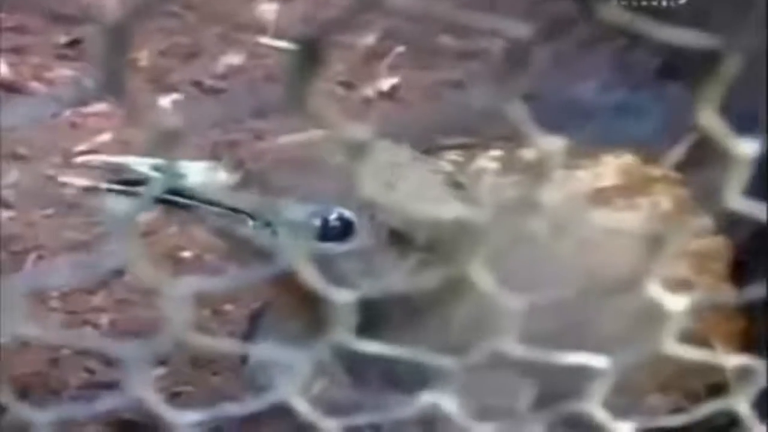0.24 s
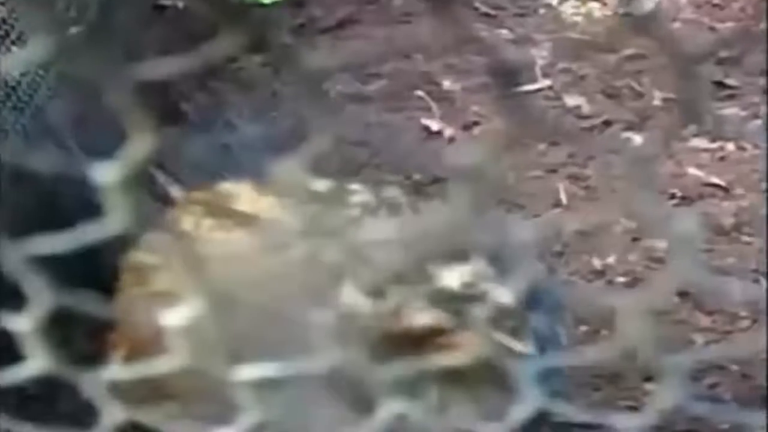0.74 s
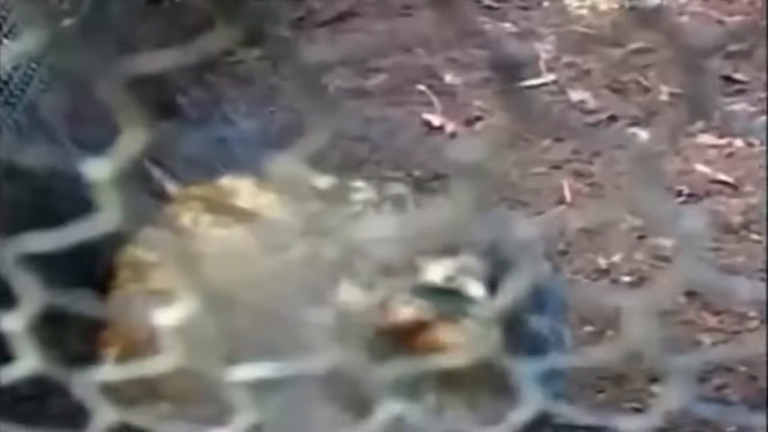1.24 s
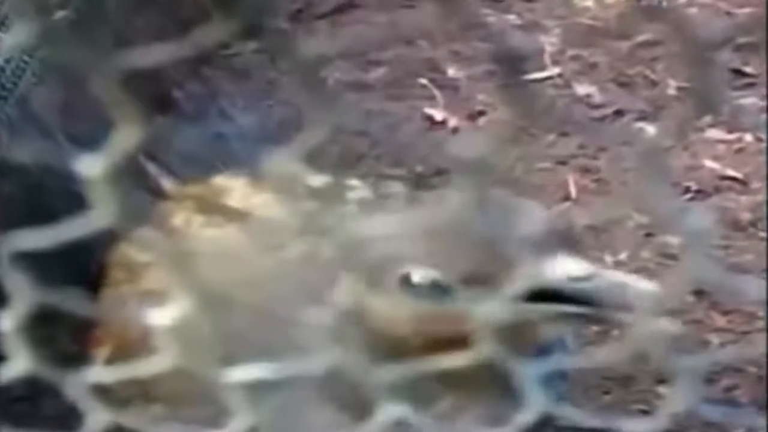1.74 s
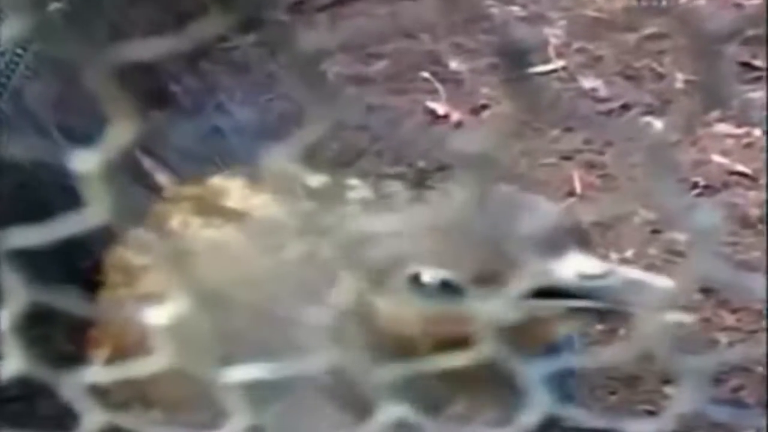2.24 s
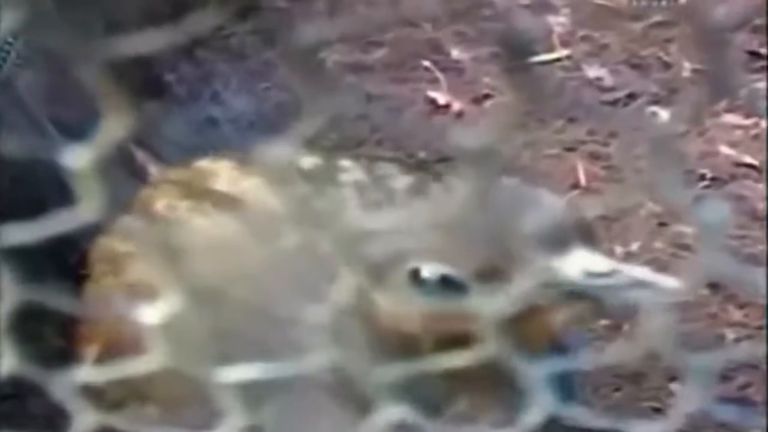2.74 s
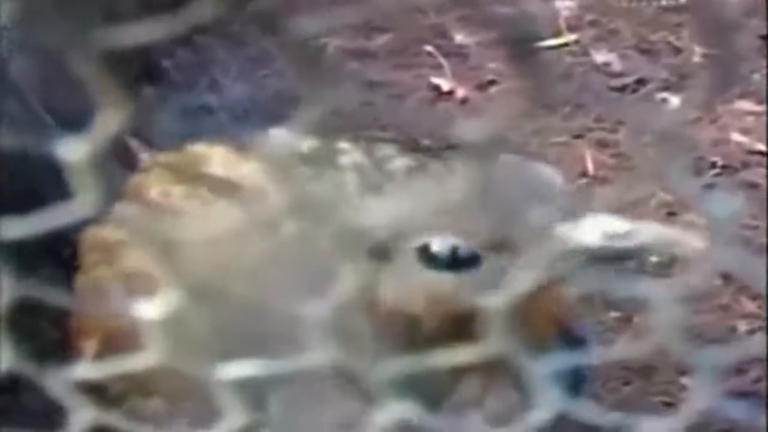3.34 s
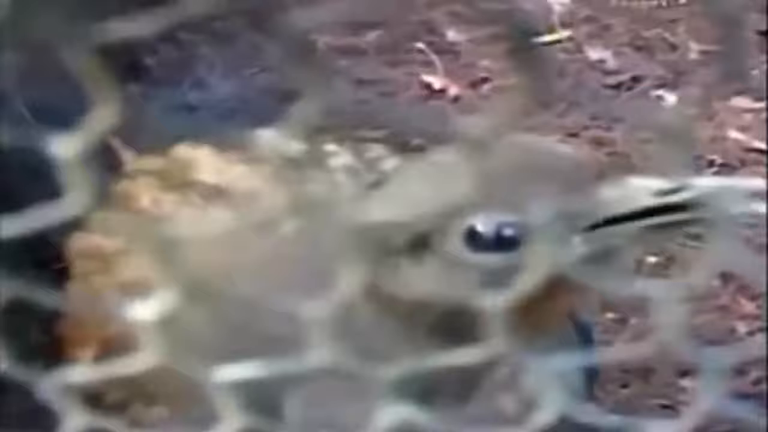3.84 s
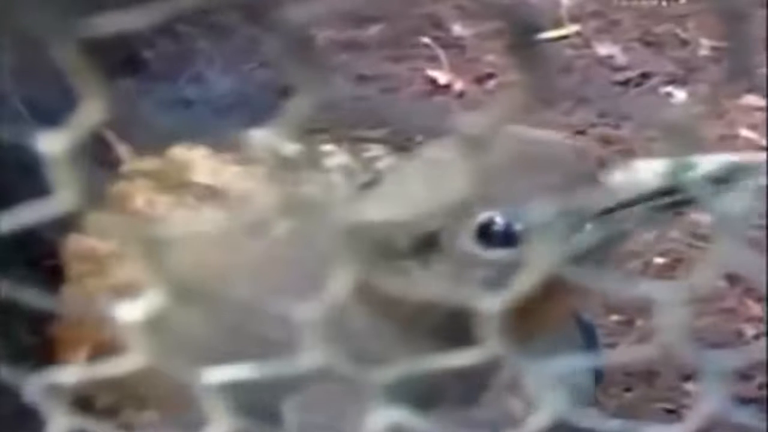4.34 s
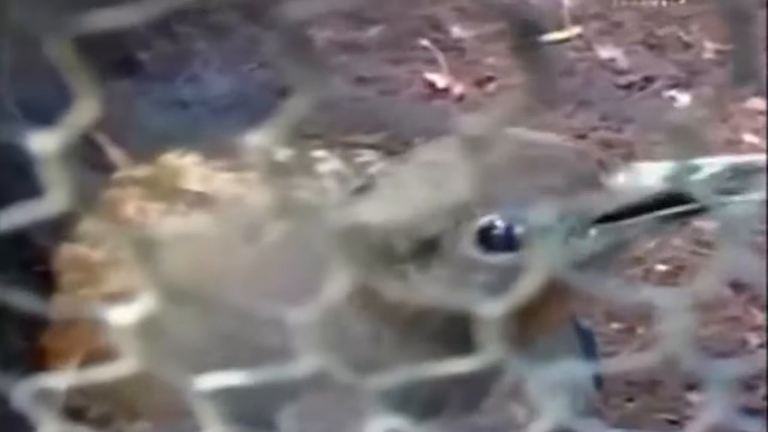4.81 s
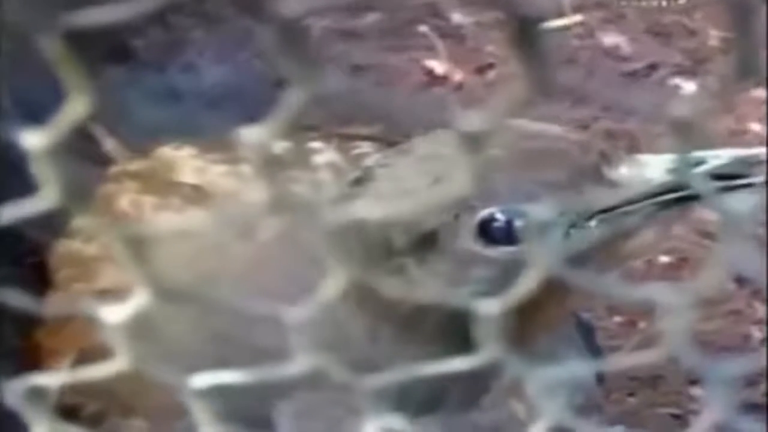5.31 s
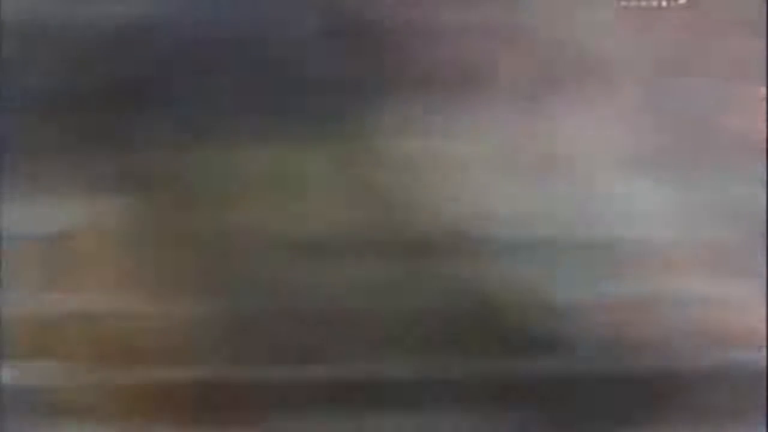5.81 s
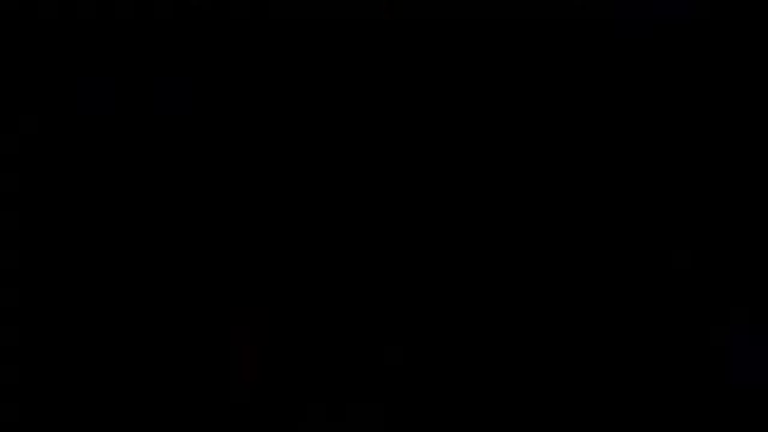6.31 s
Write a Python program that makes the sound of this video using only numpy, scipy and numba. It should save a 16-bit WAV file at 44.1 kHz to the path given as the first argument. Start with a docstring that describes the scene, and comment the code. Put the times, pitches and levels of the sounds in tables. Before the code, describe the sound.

A bird close to a small microphone imitates a power drill outdoors. It starts mid-rev, a raspy, throbbing whine over a whirr, rising and falling by 0.4 seconds. A longer, higher rev follows, sinking away by about 1.3 seconds, while distant birds call faintly. From 1.4 to 3.7 seconds the bird makes a rapid rattle, about thirty hollow clacks a second over a rough whirr, strongest in the first half second and ending with a sharp snap. After a short pause, a quick, rough rev comes at 4.1 seconds. Three more follow at about 4.6, 5.1 and 5.6 seconds, each gliding up and down with a metallic edge, the last one longer and higher. A soft, low park rumble and faint airy noise continue underneath, with occasional far bird calls. Everything cuts off abruptly at 6.3 seconds.

```python
"""A mimic bird behind wire mesh imitates a power drill, close to a small camera microphone.
One side of its voice box (the syrinx) whines up and down in pitch. The other side flutters
chaotically, making a whirr that rings the windpipe, chest and beak. In the long middle stretch
the throat clacks about thirty times a second. Far birds call over the rumble of a park."""
import sys
import numpy as np
from scipy import signal
from scipy.io import wavfile
from scipy.ndimage import uniform_filter1d
from numba import njit

SR = 44100
rng = np.random.default_rng(int(sys.argv[2]) if len(sys.argv) > 2 else 0)


def master_out(mix):
    """Clip the mix to full scale and print it as 16-bit PCM to the path in sys.argv[1]."""
    frames = np.transpose(np.atleast_2d(mix))
    ceiling = np.clip(frames, -1, 1)
    pcm = np.round(ceiling * 32767).astype(np.int16)
    wavfile.write(sys.argv[1], SR, pcm)


N = 289737

# Named song shapes, each like a drill being revved. Levels in all tables are relative.
# (time into the shape [s], pitch [Hz], whine [dB], whirr [dB], treble [dB])
REV_SHAPES = { "short": [(0, 600.4, -36.5, -35, -83), (.06, 726.6, -27, -17, -41),
              (.115, 911.4, -21, -19.5, -38.5), (.155, 1068, -20.5, -21.5, -39),
              (.19, 1141, -22.5, -21.5, -39), (.29, 1198, -23.5, -24, -39), (.34, 1270, -24.5, -24.5, -36),
              (.455, 996, -27, -27, -57), (.535, 710.1, -46.5, -28.5, -65.5)],
              "long": [(0, 715, -42, -26.5, -68), (.07, 810, -25, -20.5, -53.5),
              (.12, 1040, -22, -17, -48.5), (.29, 1450, -28.5, -21, -41), (.4, 1530, -24.5, -18, -38),
              (.53, 1555, -24, -20.5, -40.5), (.565, 1470, -27.5, -22, -42), (.6, 1335, -28, -22.5, -46),
              (.7, 1140, -28, -30.5, -50.5), (.875, 805, -34, -28.5, -57)],
              "stub": [(0, 1009, -32.5, -26.5, -58), (.03, 1010, -46, -32.5, -87)],
              "blip": [(0, 699.9, -58, -36.5, -52.5), (.024, 738.6, -55.5, -22.5, -48),
              (.085, 823.4, -26.5, -16, -34.5), (.115, 890.4, -21, -16.5, -36),
              (.16, 1328, -21.5, -25, -29), (.19, 1330, -17, -31.5, -34), (.22, 1150, -19.5, -15, -31),
              (.27, 692.9, -33, -21.5, -46), (.305, 572.2, -36.5, -38, -74), (.32, 522.8, -57, -35, -80)],
              "arch": [(0, 545, -53, -37, -68.5), (.028, 662.4, -31.5, -24, -39.5),
              (.09, 910, -21, -23, -36), (.175, 1089, -20.5, -27, -40), (.23, 1145, -22.5, -24.5, -41.5),
              (.325, 1098, -23, -25, -39.5), (.37, 995, -21.5, -20.5, -42), (.45, 661.6, -45.5, -25, -64)],
              }
# The shapes as sung: (name, start [s], gain [dB], unevenness [0-1], chest [dB], overtone boost [dB])
REVS_SUNG = [("short", -.147, 0, 0.077, -45, .1), ("long", .424, 0, 0.16, -45, .1),
             ("stub", 1.364, 0, 0.19, -42, .1), ("blip", 4.08, 0, 0.54, -36, -12.5),
             ("arch", 4.575, 0, .08, -47.5, .1), ("short", 5.06, 0, 0.074, -47.5, .1),
             ("long", 5.631, -2.5, 0.099, -46.5, .1)]
# When the bird whines: (start [s], end [s])
WHINE_SPANS = [(0, 1.395), (4.08, 4.4), (4.575, 6.3)]
# The tone at twice the pitch: (pitch [Hz], level against the lowest tone [dB])
OCTAVE_LEVELS = [(600, 0), (900, -5), (1080, -5), (1270, -0.5), (1450, 1), (1550, -6)]
# Overtones that give the whine its edge: (multiple of the pitch, level [dB])
EDGE_OVERTONES = [(3, -17.5), (4, -28.5), (5, -25), (6, -33), (7, -38)]
# Where the windpipe rings: (frequency [Hz], width [Hz], level [dB])
PIPE_RINGS = [(799, 680, 5.5), (980.6, 346, -2.5), (1565, 350, 2), (2071, 427, 0), (2380, 570, 11.5),
              (3008, 315, 9)]
# Where the beak rings: (frequency [Hz], width [Hz], level [dB])
BEAK_RINGS = [(3395, 190, 5), (3948, 570, 2), (4467, 400, 4), (5147, 310, -1), (5535, 380, -2.5),
              (6234, 1200, -5), (7886, 970, -3), (8886, 740, -13), (9640, 500, -6.5)]
# Balance of the windpipe's rings, one row for whining and one for clacking:
# (second ring [dB], third ring [dB], fourth ring [dB], top rings [dB], their rise with treble [dB/dB])
PIPE_BALANCE = [(-14, -13.5, -4.5, 10.8, 1.1), (-8.5, -14.5, -12, 8.94, 0.62)]
# The whirr under the clacks:
# (time [s], whirr [dB], treble [dB], pulsing of the low rings [factor], lowest, nasal ring [dB])
RATTLE_WHIRR = [(1.44, -35, -70, .5, -31), (1.47, -35.5, -45, .5, -11), (1.485, -21, -41.5, .5, -16),
                (1.55, -17, -38, .5, -16), (1.73, -16, -38, .5, -14), (2.0, -16.5, -37, .5, -20.5),
                (2.35, -21, -41, .5, -11.5), (2.84, -17.5, -38.5, .6, -20.5), (3.2, -23.5, -44, 3, -13.5),
                (3.5, -21, -45.5, 3.3, -14.5), (3.61, -12, -41, .6, -15.5), (3.64, -15, -44, .5, -6),
                (3.66, -28, -49.5, .5, -7), (3.71, -48, -71, .5, -2)]
# Snaps of the throat: (time [s], level [dB], frequency [Hz])
THROAT_CLACKS = [(1.4455, -25, 1440), (1.4864, -10, 1530), (1.517, -8, 1563), (1.5439, -4, 1530),
                 (1.5717, -3, 1647), (1.5996, -3.5, 1577), (1.6328, -2.5, 1630), (1.667, -5, 1870),
                 (1.7001, -4, 1633), (1.734, -3.5, 1685), (1.7695, -2.5, 1913), (1.8063, -3, 1687),
                 (1.8422, -4.5, 1640), (1.8726, -6.5, 1930), (1.9054, -8, 1950), (1.9357, -6, 2045),
                 (1.9704, -3, 2130), (2.0014, -10, 2015), (2.0318, -12, 1930), (2.0627, -10, 1964),
                 (2.0925, -12, 2840), (2.1241, -16, 2060), (2.153, -9.5, 2060), (2.1814, -11, 2774),
                 (2.2123, -10, 1980), (2.2427, -11.5, 2310), (2.2735, -13.5, 1310), (2.3077, -14, 1457),
                 (2.3391, -12, 1476), (2.3624, -15, 2150), (2.3932, -14, 1575), (2.4154, -17, 1970),
                 (2.444, -13, 2900), (2.476, -12, 1430), (2.5087, -16, 1630), (2.5336, -22, 1840),
                 (2.5571, -35, 2970), (2.595, -17, 1390), (2.6319, -12.5, 2820), (2.6628, -16, 2120),
                 (2.6943, -10.5, 2410), (2.727, -9.5, 1520), (2.7592, -13, 1500), (2.7867, -10, 1520),
                 (2.815, -9.5, 2870), (2.8444, -13, 2480), (2.8779, -13, 2096), (2.912, -15, 1430),
                 (2.952, -18, 1410), (2.991, -11, 2320), (3.0325, -11.5, 2190), (3.0744, -10, 1954),
                 (3.1143, -8, 2170), (3.1478, -15, 1575), (3.189, -12, 1530), (3.2231, -17.5, 2875),
                 (3.2598, -13, 1530), (3.2989, -17.5, 1990), (3.3365, -11, 2496), (3.379, -11, 1910),
                 (3.417, -20, 1370), (3.4535, -17, 2090), (3.4884, -19, 1910), (3.5289, -23, 1990),
                 (3.5578, -28, 1910), (3.5913, -21, 1550), (3.6118, -3.5, 1918), (3.6384, -27, 1520),
                 (4.0853, -20.5, 1360), (4.1078, -11, 1470)]
# Far birds: (start [s], end [s], first pitch [Hz], last pitch [Hz], width [Hz], level [dB])
FAR_CALLS = [(1.073, 1.107, 4120, 4900, 210, -35), (1.096, 1.248, 4630, 4800, 540, -36),
             (1.11, 1.308, 5960, 5260, 1600, -40), (1.279, 1.357, 4460, 4700, 680, -35),
             (1.33, 1.404, 5300, 5850, 950, -37), (1.257, 1.389, 1940, 1980, 220, -29),
             (3.687, 3.748, 1106, 1060, 15, -46), (3.694, 3.837, 2430, 2550, 470, -49.5),
             (3.762, 3.883, 947, 923, 17, -51), (3.848, 4.043, 6170, 5860, 590, -57),
             (3.945, 4.09, 710, 786, 38, -56), (4.435, 4.578, 1670, 1566, 76, -48),
             (4.967, 5.127, 4700, 5710, 1210, -40), (6.286, 6.292, 4140, 4600, 200, -33)]
# The park's steady wash of noise: (frequency [Hz], level [dB])
PARK_SPECTRUM = [(18, -69), (30, -39), (144, 1), (179, -14), (467, -19), (927, -8), (1480, -24),
                 (1630, -23), (1890, -15.5), (3240, -19), (4670, -27.5), (5830, -24.5), (10500, -76),
                 (13600, -77), (22000, -120)]
# The park's low rumble: (time [s], level [dB])
RUMBLE_LEVELS = [(0.0, -55), (0.49, -58), (0.68, -49), (1.12, -52), (1.39, -51), (1.42, -57), (1.58, -67),
                 (1.6, -48), (2.14, -57), (3.14, -53.5), (3.95, -62), (4.14, -50), (4.35, -57.5),
                 (6.3, -54)]

THROB_HZ, THROB_DEPTH = 44.2, .36  # the whine's beat at a pitch of 1000 Hz
FAST_GLIDE_HZ_PER_S = 2400
END_S = 6.297


def whine(voice, beat, sway):
    """One side of the voice box vibrates regularly: a tone and its overtones, trembling and throbbing."""
    hz, whine_db = voice["hz"], voice["whine_db"]
    wobble = 1 + .016 * walk(150) + .008 * walk(25) + .013 * sway
    phase = 2 * np.pi * np.cumsum(hz * wobble) / SR
    # overtones light up as they glide through a metallic ring of the beak
    edge = sum(undb(db) * np.sin(k * (phase + .24)) for k, db in EDGE_OVERTONES)
    edge = edge + undb(7) * band(edge, hz=5825, width=500)
    edge *= undb(voice["treble_db"] - voice["whirr_db"] + 17.5)  # a wide beak lets more out
    # the tone at three times the pitch is strong until it passes the top of the windpipe's range
    third = undb(-10.5) / (1 + (3 * hz / 3230) ** 30) * np.sin(3 * phase + 3.4)
    octave_db = whine_db + np.interp(hz, *np.transpose(OCTAVE_LEVELS))
    upper = undb(octave_db + 4 * voice["sinking"] + voice["boost_db"]) * (np.cos(2 * phase) + third + edge)
    # strong and weak cycles in turn add tones at 0.5 and 1.5 times the pitch
    between = voice["uneven"] * (.21 * np.sin(phase / 2) + np.sin(3 * phase / 2))
    tone = undb(whine_db) * (np.sin(phase) + between) + upper
    pulsing = 1 + np.clip(THROB_DEPTH * (1000 / hz) ** 1.1, 0, .6) * beat  # deepest on low, slack notes
    # quick flutter of the membrane adds a rasp, more so while the pitch climbs
    rasp = undb(.82 * walk(70)) + (.2 + .12 * voice["rising"]) * walk(200)
    return np.sqrt(2) * undb(1.5) * voice["whining"] * pulsing * rasp * tone


def throb(voice):
    """The whine's uneven beat, slower on high notes: one wave for loudness and one for pitch."""
    rate_hz = THROB_HZ - .00966 * (voice["hz"] - 1000)
    phase = 2 * np.pi * np.cumsum(rate_hz * (1 + .059 * walk(11.9))) / SR
    return voice["whining"] * np.cos(phase), voice["whining"] * np.sin(phase)


def song():
    """The bird's pitch and levels over time: the revs, with the rattle between them."""
    hz, whine_db, whirr_db, treble_db, uneven, chest_db, boost_db = curves(
        [(start + s, pitch, *(db + gain for db in levels), *manner)
         for name, start, gain, *manner in REVS_SUNG for s, pitch, *levels in REV_SHAPES[name]])
    rattle_db, rattle_treble_db, pulse, nasal_db = curves(RATTLE_WHIRR)
    whining, clacking = gate(WHINE_SPANS), gate([(RATTLE_WHIRR[0][0], RATTLE_WHIRR[-1][0])])
    glide = whining * uniform_filter1d(np.gradient(hz), size=1500) * SR / FAST_GLIDE_HZ_PER_S
    pick = lambda in_whine, in_rattle: np.where(clacking > 0, in_rattle, in_whine)
    return dict(hz=hz, sinking=np.clip(-glide, 0, 1), rising=np.clip(glide, 0, 1.5),
                whining=whining, whine_db=whine_db, uneven=uneven, boost_db=boost_db,
                clacking=clacking, pulse=pulse,
                whirr_db=pick(whirr_db, rattle_db), treble_db=pick(treble_db, rattle_treble_db),
                nasal_db=pick(-8, nasal_db), chest_db=pick(chest_db, -41.5),
                balance=[pick(*pair) for pair in zip(*PIPE_BALANCE)])


def whirr(voice, beat):
    """The other side's membrane slaps at random; with breath noise it rings windpipe, chest and beak."""
    db, treble_db = voice["whirr_db"], voice["treble_db"]
    second_db, third_db, fourth_db, top_db, top_rise = voice["balance"]
    slaps = (rng.random(N) < 2500 / SR) * undb(2.6 * rng.standard_normal(N))
    flutter = unit(slaps - slaps.mean()) + .96 * rng.standard_normal(N)
    flutter *= undb(.54 * walk(38)) * (1 + .013 * beat)
    # a small throat gives off no bass
    throat = signal.sosfilt(signal.butter(6, 600, "high", fs=SR, output="sos"), flutter)
    low = (undb(voice["nasal_db"]) * ring(throat, PIPE_RINGS[:1])
           + undb(second_db) * ring(throat, PIPE_RINGS[1:2])
           - undb(third_db) * ring(throat, PIPE_RINGS[2:3]))
    low *= undb(db) * (1 + voice["pulse"] * clack_pressure(rise_s=.0086, fall_s=.0013))
    # each jump in pressure shakes the upper rings and the chest
    push = clack_pressure(rise_s=.0016, fall_s=.0041)
    top_db = top_db - 40 + top_rise * (treble_db + 40.5) + .4 * voice["whining"] * voice["boost_db"]
    high = undb(db + fourth_db) * ring(flutter, PIPE_RINGS[3:4])
    high += undb(top_db) * ring(flutter, PIPE_RINGS[4:])
    high *= 1 + 2.77 * push
    chest = undb(voice["chest_db"] + .38 * (db + 19)) * unit(band(band(flutter, 480, 470), 503, 480))
    chest += undb(db - 22.5) * push * unit(band(flutter, 270, 160))
    beak = undb(treble_db + 4) * ring(flutter, BEAK_RINGS)
    beak *= 1 + 2.1 * clack_pressure(rise_s=.00056, fall_s=.0083)
    # the beak held for whining adds one narrow metallic ring
    beak += voice["whining"] * undb(treble_db - 7.5) * unit(band(flutter, 5750, 170))
    return -(voice["whining"] + voice["clacking"]) * (low + high + chest + beak)


def clacks():
    """The throat snaps shut: its hollow rings briefly, falling in pitch, and a tick rings the beak."""
    snaps, ticks, t = np.zeros(N), np.zeros(N), np.arange(-200, 400) / SR
    for s, db, hz in THROAT_CLACKS:
        turn, chance = rng.random(2)
        falling_hz = hz * np.exp(-(t - .0024) / .01298)
        phase = 2 * np.pi * (np.cumsum(falling_hz) / SR + turn)
        shape = np.exp(-((t - .0015) / np.where(t < .0015, .0008, .0019)) ** 2)
        tick_db = min(db + 18, 0) + 5.5 * (2 * chance - 1)
        i = int(s * SR) - 200
        snaps[i:i + len(t)] += undb(db) * shape * np.sin(phase)
        ticks[i:i + len(t)] += undb(tick_db) * shape * rng.standard_normal(len(t))
    return snaps + undb(-46.5) * ring(ticks, BEAK_RINGS[1:5])


def clack_pressure(rise_s, fall_s):
    """Air pressure builds up to each clack and sags after it; louder clacks push a little harder."""
    t, pressure = np.arange(N) / SR, np.zeros(N)
    for s, db, _ in THROAT_CLACKS:
        near = slice(int((s - .03) * SR), int((s + .04) * SR))
        age = t[near] - s
        pressure[near] += undb(.29 * db) * np.exp(np.where(age < 0, age / rise_s, -age / fall_s))
    return pressure


def reflections(bird, fade_s=.059):
    """Ground and wire mesh throw back a short splash of the bird's sound."""
    t = np.arange(4000) / SR
    splash = rng.standard_normal(len(t)) * np.exp(-np.log(1000) * t / fade_s) * (t > .002)
    return undb(-10) * signal.fftconvolve(bird, splash / np.linalg.norm(splash))[:N]


def far_birds():
    """Hoarse, breathy calls from further off: each is a gliding band of noise."""
    calls = np.zeros(N)
    for start, end, first_hz, last_hz, width, db in FAR_CALLS:
        i, n = int(start * SR), int((end - start) * SR)
        note = band(rng.standard_normal(N // 20)[:n], np.linspace(first_hz, last_hz, n), width)
        calls[i:i + n] += undb(db) * unit(note) * signal.windows.tukey(n, .45)
    return calls


def park():
    """Bands of far noise that each flicker on their own, with gusts of rumble below."""
    hz, db = np.transpose(PARK_SPECTRUM)
    air = np.zeros(N)
    for centre in 200 * 2 ** np.arange(0, 5.7, .4):
        band_db = np.interp(np.log(centre), np.log(hz), db) + 2.8 * walk(11)
        air += undb(band_db) * band(rng.standard_normal(N), centre, centre / 4)
    gust_db = curves(RUMBLE_LEVELS)[0] + 2.3 * walk(2.8)
    rumble = unit(band(band(rng.standard_normal(N), 150, 240), 140, 340)) + .04 * walk(30)
    return undb(-50.5) * unit(air) + undb(gust_db + .37 * walk(7)) * rumble


def undb(db):
    """Turn decibels into a factor to multiply by."""
    return 10 ** (np.asarray(db) / 20)


def unit(x):
    """Scale a signal to an average strength (rms) of 1."""
    return x / np.sqrt(np.mean(x ** 2))


@njit
def band_pass(x, hz, width):
    """A filter that lets through the sound near a frequency, which may move."""
    y, band_state, low_state = np.empty(len(x)), 0., 0.
    for i in range(len(x)):
        tuning, damping = np.tan(np.pi * hz[i] / SR), width / hz[i]
        swing = (band_state + tuning * (x[i] - low_state)) / (1 + tuning * (tuning + damping))
        band_state = 2 * swing - band_state
        low_state += 2 * tuning * swing
        y[i] = damping * swing
    return y


def band(x, hz, width):
    """A sharper ring (resonance): the same filter twice."""
    hz = np.ones(len(x)) * hz
    return band_pass(band_pass(x, hz, float(width)), hz, float(width))


def ring(x, rings):
    """Send a sound through several rings, adding and subtracting them in turn."""
    return unit(sum((-1) ** k * undb(db) * band(x, hz, width) for k, (hz, width, db) in enumerate(rings)))


def walk(rate_hz):
    """A smooth random wander with a typical size of 1."""
    return unit(signal.sosfilt(signal.butter(2, rate_hz, fs=SR, output="sos"), rng.standard_normal(N)))


def curves(rows):
    """Join a table's timed points with straight lines, one curve for each column."""
    times, *columns = np.array(sorted(rows)).T
    return [np.interp(np.arange(N) / SR, times, column) for column in columns]


def gate(spans):
    """1 during each span and 0 outside, with soft edges."""
    t = np.arange(N) / SR
    return uniform_filter1d(1. * sum((t >= start) * (t < end) for start, end in spans), size=150)


def scene():
    """The bird and its reflections over far birds and the park; all stops at once near the end."""
    voice = song()
    beat, sway = throb(voice)
    bird = whine(voice, beat, sway) + whirr(voice, beat) + clacks()
    past_s = np.clip(np.arange(N) / SR - END_S, 0, None)
    stop = np.where(past_s > 0, undb(-20 - 800 * past_s), 1.)
    return ((bird + reflections(bird) + far_birds() + park()) * stop)[None]


def record(dry):
    """The input hisses faintly and rounds loud clacks; the microphone loses deep bass and top treble."""
    hiss = undb(-74.5) * unit(band(rng.standard_normal(N), 8500, 4000)) * (np.arange(N) < END_S * SR)
    rounded = .85 * np.tanh((dry + hiss) / .85)
    soft = signal.sosfilt(signal.butter(3, [45, 9900], "band", fs=SR, output="sos"), rounded)
    return signal.sosfilt(signal.ellip(10, .2, 80, 10500, fs=SR, output="sos"), soft)


dry = scene()
out = record(dry)
master_out(out)
```